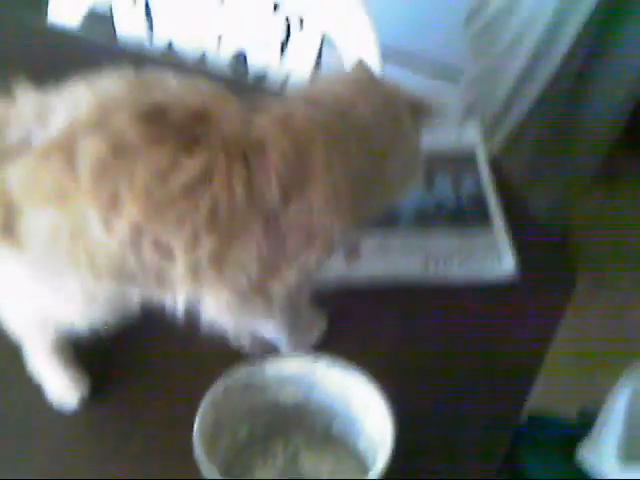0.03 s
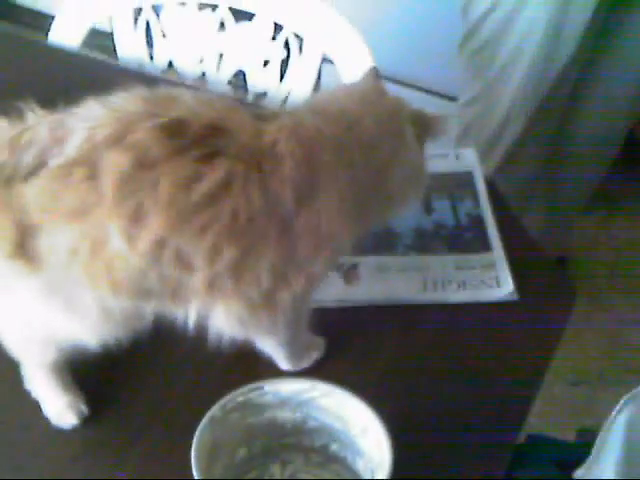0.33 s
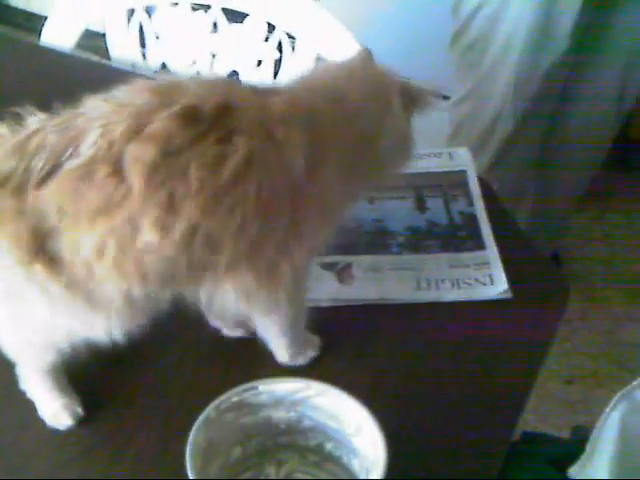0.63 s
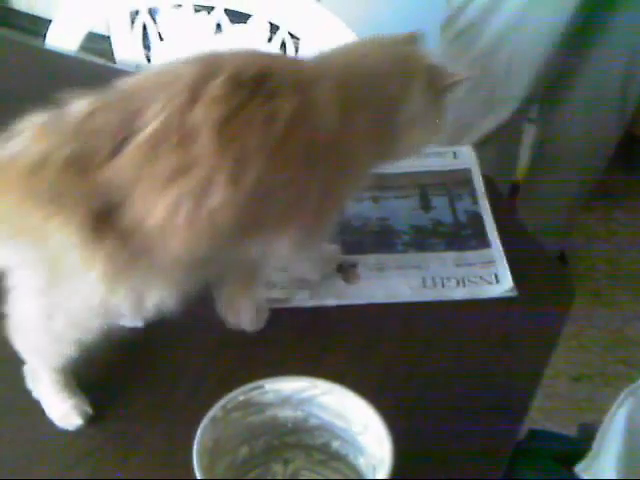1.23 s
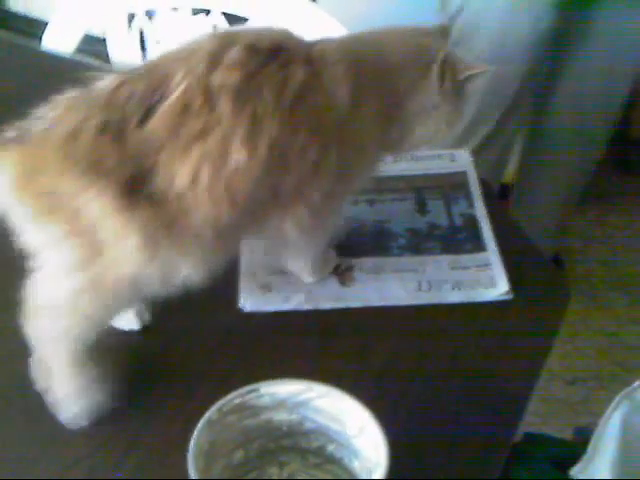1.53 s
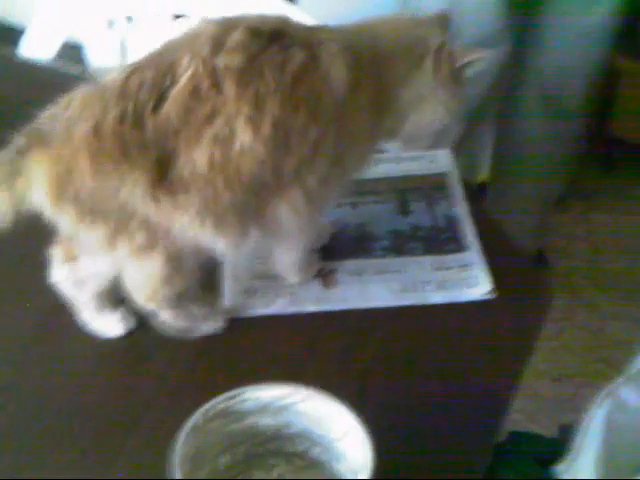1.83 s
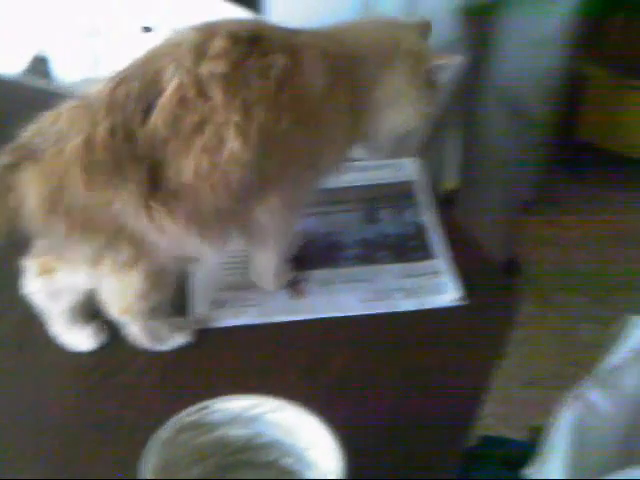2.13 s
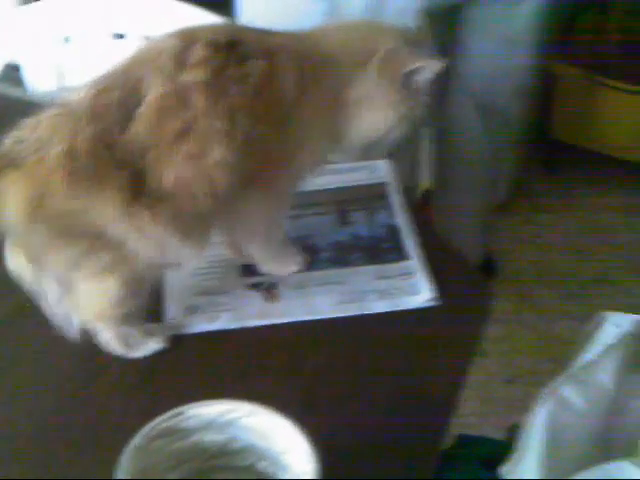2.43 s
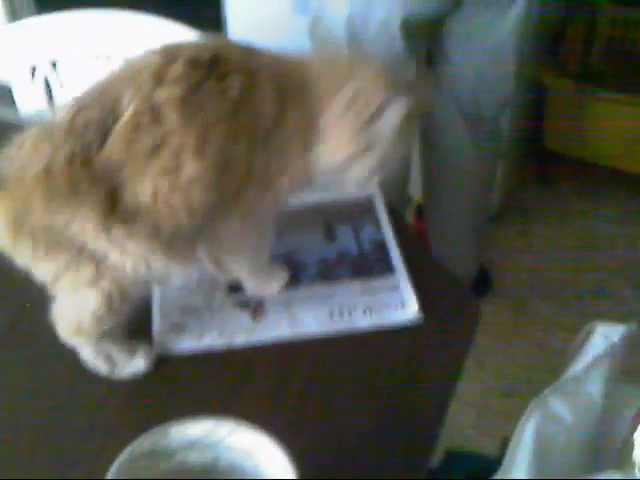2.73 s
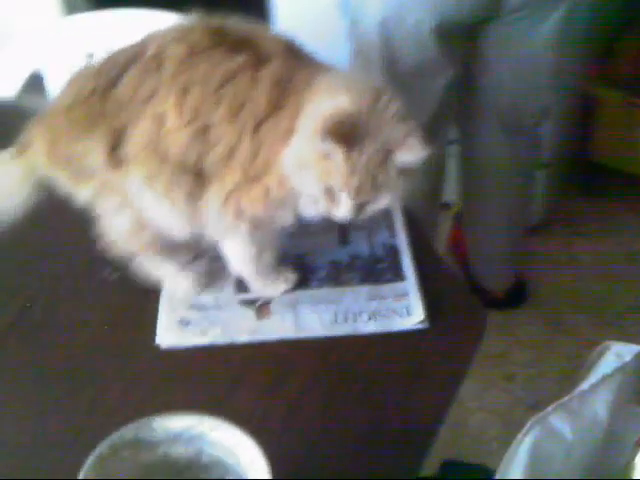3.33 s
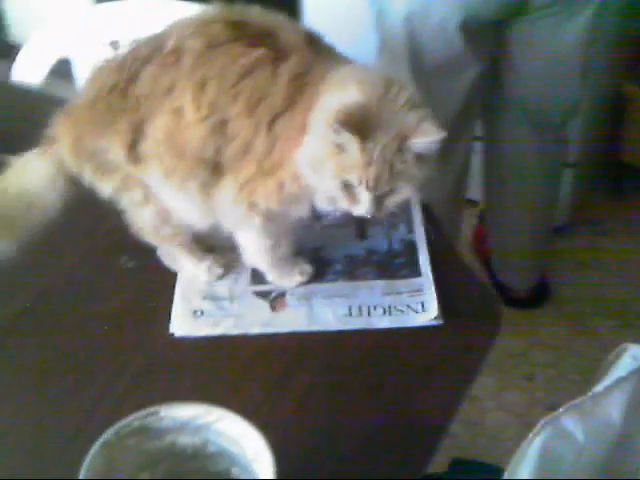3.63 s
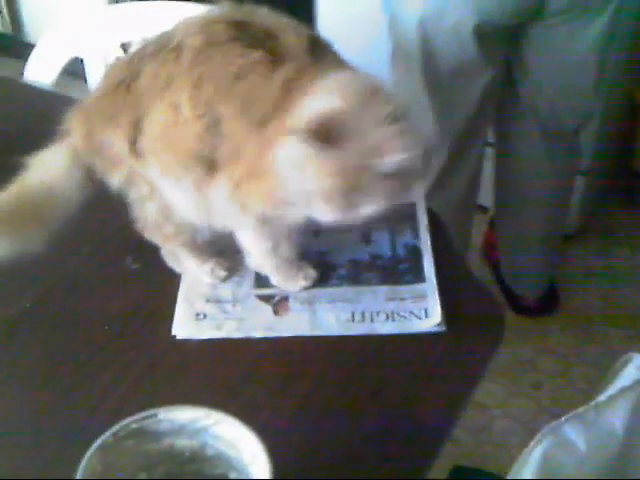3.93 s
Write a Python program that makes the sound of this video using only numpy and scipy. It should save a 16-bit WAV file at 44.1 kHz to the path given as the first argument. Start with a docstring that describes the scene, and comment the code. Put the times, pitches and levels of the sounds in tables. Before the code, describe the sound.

Close handling bumps thud irregularly on a microphone from the start, mixed with short plastic taps, loudest and distorted around 1.4 and 2.6 seconds. A cat's paws faintly scuff newspaper at about 1.4, 1.9 and 3.5 seconds. A wooden table is knocked at 3.3 seconds and more softly at 3.5, followed by a few lighter bumps near 3.8. Steady room rumble and gritty hiss lie underneath throughout.

```python
"""Handling bumps thud into the microphone of a small hand-held camera and overload it.
The harder contacts also make its plastic case ring. Close by, a cat steps from a wooden table
onto a newspaper: its paws scuff the paper and something knocks on the wood.
Room rumble and hiss lie under it all, and the recorder's slow, held samples add a gritty treble."""
import sys
import numpy as np
from scipy import signal
from scipy.fft import rfft, irfft
from scipy.io import wavfile

SR = 44100
rng = np.random.default_rng(int(sys.argv[2]) if len(sys.argv) > 2 else 0)


def generate_wav(sig):
    """Save sig (samples, or channels by samples) to the path in sys.argv[1] as 16-bit PCM at SR."""
    pcm = np.round(np.clip(np.atleast_2d(sig).T, -1, 1) * 32767).astype(np.int16)
    wavfile.write(sys.argv[1], SR, pcm)


N = 176400
T = np.arange(N) / SR
HOLD_HZ = 8000   # how many samples the recorder takes each second


def from_db(db):
    """Turn decibels into a number to multiply by."""
    return 10 ** (np.asarray(db) / 20)


def noise(gain_at):
    """Noise of strength (rms) 1, shaped by gain_at(hz), with nothing above half of HOLD_HZ."""
    hz = np.maximum(np.arange(N // 2 + 1) * SR / N, 1)
    x = irfft(rfft(rng.standard_normal(N)) * gain_at(hz) * (hz < HOLD_HZ / 2), N)
    return x / np.sqrt(np.mean(x ** 2) + 1e-20)


def colour(points, hz):
    """Join a table's (frequency, level) points into a curve and read its gain at hz."""
    f, db = np.transpose(points)
    return from_db(np.interp(np.log(hz), np.log(f), db))


def below(hz, corner_hz):
    """A gain that keeps low frequencies and fades those above the corner."""
    return 1 / np.sqrt(1 + (hz / corner_hz) ** 4)


def drift(rate_hz):
    """A random wobble of typical size 1, mostly slower than rate_hz."""
    return noise(lambda hz: below(hz, rate_hz))


def ring(clicks, hz, fade_s):
    """Each click starts a pure tone that dies away by 60 dB in fade_s."""
    keep = np.exp(-np.log(1000) / (fade_s * SR))
    turn = 2 * np.pi * hz / SR
    return signal.lfilter([0, np.sin(turn)], [1, -2 * keep * np.cos(turn), keep * keep], clicks + 1e-18)


# The tone of the room noise, from low to high: f/Hz, relative level/dB
ROOM_TONE = [(12, -36), (20, 2), (63, -1), (87, -8), (108, -9.5), (184, -9.5), (267, -18), (291, -13.5),
             (325, -17.5), (355, -20), (414, -16.5), (539, -22), (656, -19), (873, -28.5), (3800, -38.5),
             (4940, -14), (8360, -120)]
# How the room noise gently rises and falls: t/s, added level/dB
ROOM_SWELL = [(0, 0.5), (.4, 1.5), (1.0, 2), (1.5, 1.3), (2.05, 1.06), (2.5, 1), (3.2, 1.5), (3.5, 2),
              (4, 1)]

def room(split_hz=280, whine_hz=2179):
    """The room has a lumpy low rumble, a smoother hiss above it and a faint, steady whine."""
    rumble = noise(lambda hz: colour(ROOM_TONE, hz) * (hz < split_hz))
    rumble *= from_db(-24 + drift(rate_hz=13))
    hiss = noise(lambda hz: colour(ROOM_TONE, hz) * (hz >= split_hz))
    hiss *= from_db(-32.5 - 0.63 * drift(rate_hz=5.4))
    whine = from_db(-57) * noise(lambda hz: below(np.abs(hz - whine_hz), corner_hz=10))
    swell = from_db(np.interp(T, *np.transpose(ROOM_SWELL)))
    return (rumble + hiss) * swell + whine


# Harder contacts with the camera's case: t/s, level/dB, f/Hz
CASE_TAPS = [(.004, -8.5, 310), (0.2177, 0.5, 308), (.666, -3.5, 340), (1.194, -4.5, 285),
             (1.353, -11, 407), (1.4053, 9, 318), (2.618, -5, 238), (2.6834, -3.5, 328), (2.704, -10, 340)]

def case_taps():
    """A tap makes the plastic case ring for just a few vibrations."""
    out = np.zeros(N)
    for start, db, hz in CASE_TAPS:
        click = from_db(db) * (np.arange(N) == int(start * SR))
        out += ring(click, hz, fade_s=0.018)
    return out


# Bumps on the microphone: t/s, relative level/dB, build-up/ms, release/ms, flip time/ms
HANDLING_BUMPS = [(.011, 8, 6.8, 5.6, 0.56), (0.036, 3.5, 5.1, 3.5, 1.4), (.178, -0.5, 11, 7.2, 3),
                  (0.213, 6.5, 2, 2.8, 2.2), (0.2236, 8, 1.9, 7.2, 1.3), (0.279, 7, 4.7, 6, 1.2),
                  (0.296, 4, 7, 8.3, 2.1), (.670, 6, 4.9, 11, 1.9), (0.862, -3, 3.4, 12, 3),
                  (1.024, 3.5, 5, 10, 1.7), (1.054, -6, 2.7, 4, 1.3), (1.199, 9, 3.3, 14.6, 0.34),
                  (1.2228, 7.5, 1.9, 4.5, 0.99), (1.2973, 10.5, 2.8, 7.3, 0.68),
                  (1.357, 12.5, 2.2, 5.6, 0.29), (1.407, 14, 1.3, 3.7, 0.26), (1.4125, 14, 2.6, 1.9, 1.16),
                  (1.5138, 1.5, 3.8, 8.4, 0.95), (1.554, 1, 4.5, 5, 3), (1.697, -18, 4.1, 2.9, 2.5),
                  (1.74, -1.5, 3.9, 3, 1.8), (2.255, 8, 3.9, 9, 1.16), (2.2775, 11.5, 13.4, 3.9, 0.39),
                  (2.327, 9, 4.1, 5.4, 2.05), (2.5681, 4, 5.5, 5.3, 0.94), (2.58, 2, 4, 16, 1.4),
                  (2.613, 14.5, 4.5, 7, 0.8), (2.622, 12, 1.9, 3.6, 0.31), (2.6451, 7, 1.1, 9.7, 0.8),
                  (2.6557, 9, 2.7, 6.6, 0.42), (2.6835, 13.5, 1.17, 1.3, 0.45),
                  (2.6875, 8.5, 3.34, 6.9, 1.5), (2.7043, 1, 2.2, 3.3, 0.51), (2.749, 4, 1.55, 12, 1.4),
                  (3.798, -2, 3.8, 3.8, 0.66), (3.83, -3.5, 2.1, 8.7, 1.2), (3.855, 0, 8.1, 2, 2.3)]

def handling_bumps(gain_db=-6.5, lowest_hz=13.3):
    """Pressure on the microphone builds, flips to the other side and relaxes: a thud."""
    out = np.zeros(N)
    for flip_at, db, build_ms, release_ms, flip_ms in HANDLING_BUMPS:
        near = np.abs(T - flip_at) < 0.08
        ms = (T[near] - flip_at) * 1000
        build = np.exp(-(ms / build_ms) ** 2)
        release = np.exp(-np.abs(ms) / release_ms)
        flip = np.tanh(ms / flip_ms)
        out[near] += from_db(db + gain_db) * np.where(ms < 0, build, release) * flip
    out *= 1 + 0.084 * drift(rate_hz=435)   # rubbing roughens the thud
    mic_low_cut = signal.butter(1, lowest_hz, "high", fs=SR, output="sos")
    return signal.sosfilt(mic_low_cut, out)


# Paws on the newspaper: t/s, level/dB, rise/s, fade/s, centre f/Hz
PAW_SCUFFS = [(1.433, -22.5, 0.01, 0.049, 1110), (1.898, -33, 0.009, 0.049, 785),
              (3.45, -34.5, 0.0049, 0.011, 2250), (3.512, -30.5, 0.0045, 0.016, 1370)]

def paw_scuffs(width_octaves=0.45, body_db=6, grain_db=1.5):
    """A paw rubs the paper: a short, grainy band of noise over a duller body."""
    out = np.zeros(N)
    grain = from_db(grain_db * drift(rate_hz=100))
    for start, db, rise_s, fade_s, centre_hz in PAW_SCUFFS:
        rise = np.clip((T - start) / rise_s, 0, 1)
        fade = np.exp(-np.maximum(T - start - rise_s, 0) / fade_s)
        rub = noise(lambda hz: np.exp(-(np.log2(hz / centre_hz) / width_octaves) ** 2)
                    + from_db(body_db) * below(hz, centre_hz * 0.84))
        out += from_db(db) * rise * fade * rub
    return out * grain


# Knocks on the wooden table: t/s, level/dB
WOOD_KNOCKS = [(3.3435, -17), (3.348, -21.5), (3.354, -25), (3.513, -29)]
# The notes the wood rings at: f/Hz, relative level/dB, time to fade by 60 dB/s
WOOD_NOTES = [(251.6, 0, 0.38), (379, 0, 0.1), (463, -2, 0.085), (562, -3, 0.13), (676, -7.5, 0.1),
              (867, -16, 0.16), (1290, -16, .12), (1440, -17, .11), (1750, -17, 0.085), (2060, -23.5, 0.1)]
# The tone of the room's echo after a knock: f/Hz, relative level/dB
ECHO_TONE = [(120, -18), (250, 6), (420, 3), (560, 1.5), (780, 3.5), (1100, -20), (1450, -17), (2300, -43),
             (3800, -40)]

def wood_knocks(echo_db=-6, echo_fade_s=0.32):
    """Each knock rings all the table's notes at once and leaves a short wash of echo in the room."""
    starts, knock_db = np.transpose(WOOD_KNOCKS)
    wood, echo_level = np.zeros(N), np.zeros(N)
    for hz, note_db, fade_s in WOOD_NOTES:
        chance_db = rng.normal(0, 1, len(starts))   # no two knocks sound quite alike
        clicks = np.zeros(N)
        clicks[(starts * SR).astype(int)] = from_db(knock_db + note_db + chance_db)
        wood += ring(clicks, hz, fade_s)
    for start, db in WOOD_KNOCKS:
        fade = from_db(-60 * np.abs(T - start) / echo_fade_s)
        echo_level += from_db(db + echo_db) * (T > start) * fade
    return wood + echo_level * noise(lambda hz: colour(ECHO_TONE, hz))


def scene():
    """All the sounds add up at the one microphone."""
    return (room() + case_taps() + handling_bumps() + paw_scuffs() + wood_knocks())[None]


def record(dry, ceiling=0.95, top_hz=15600):
    """The recorder flattens loud peaks, holds each slow sample until the next and cuts the very top."""
    clipped = np.clip(dry, -ceiling, ceiling)
    held_at = np.ceil(np.floor(T * HOLD_HZ) * SR / HOLD_HZ).astype(int)
    stepped = clipped[:, np.minimum(held_at, N - 1)]   # the steps make the gritty treble
    top_cut = signal.ellip(12, 0.1, 70, top_hz, fs=SR, output="sos")
    return signal.sosfilt(top_cut, stepped)


dry = scene()
out = record(dry)
generate_wav(out)
```